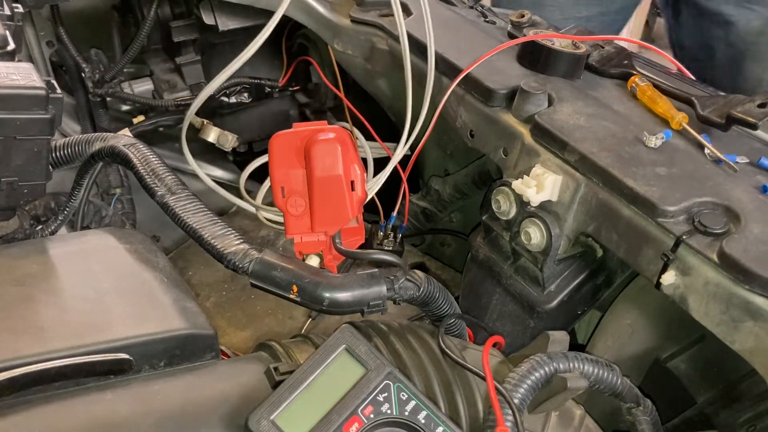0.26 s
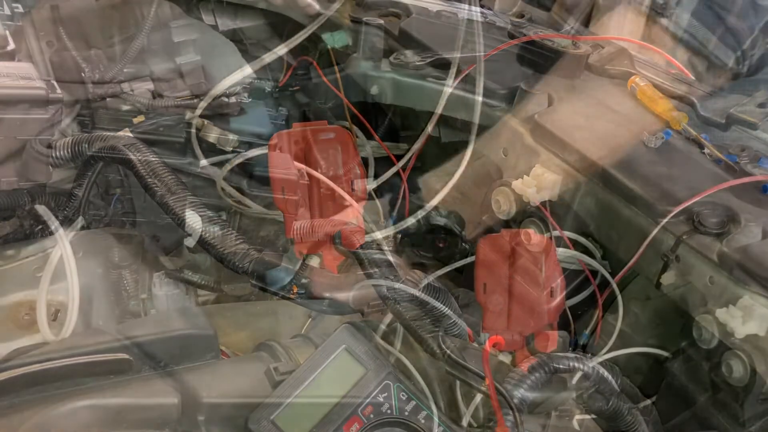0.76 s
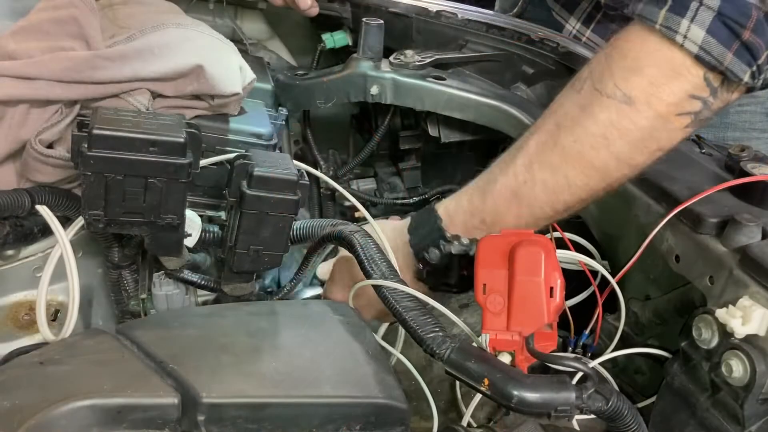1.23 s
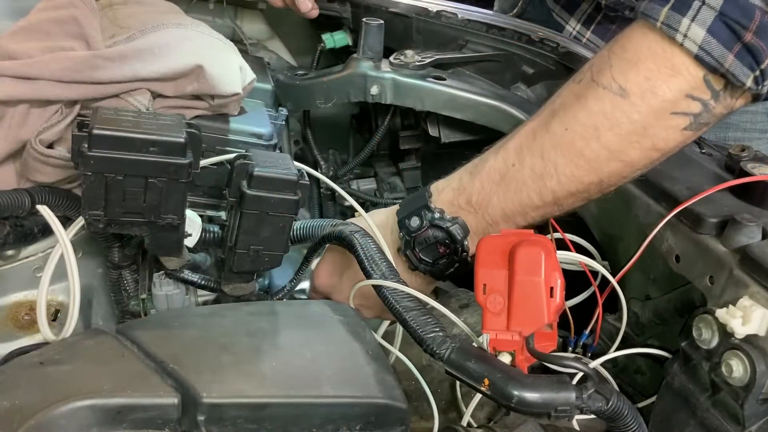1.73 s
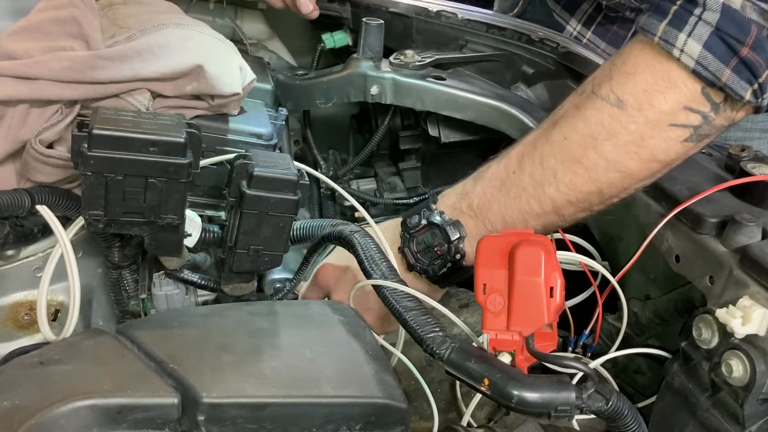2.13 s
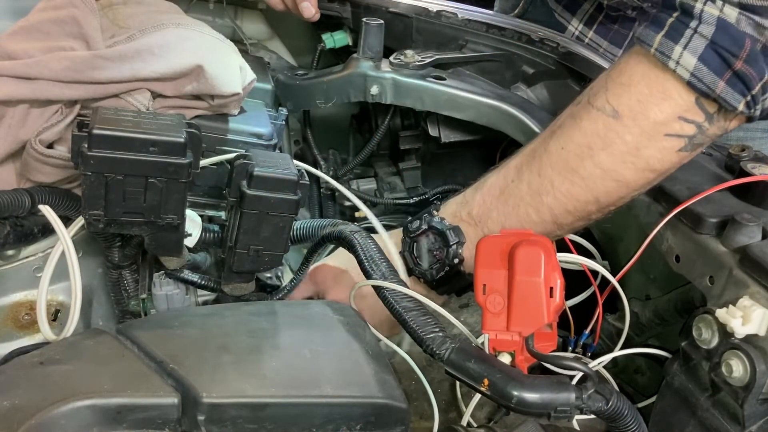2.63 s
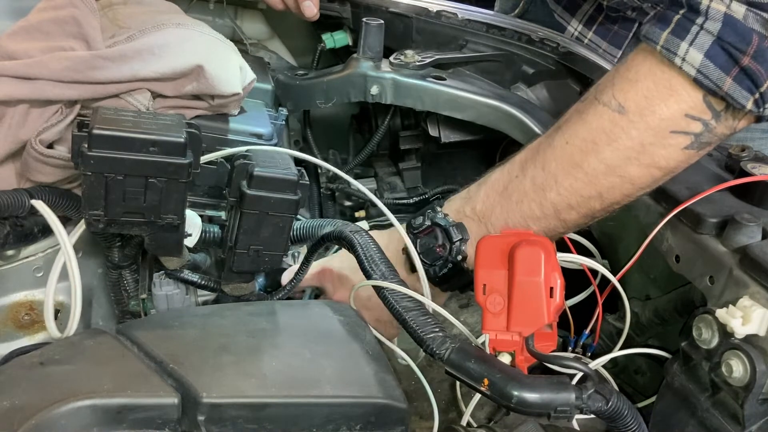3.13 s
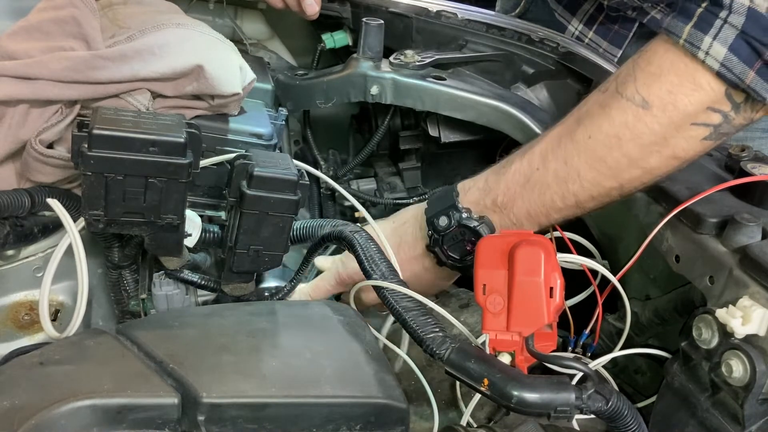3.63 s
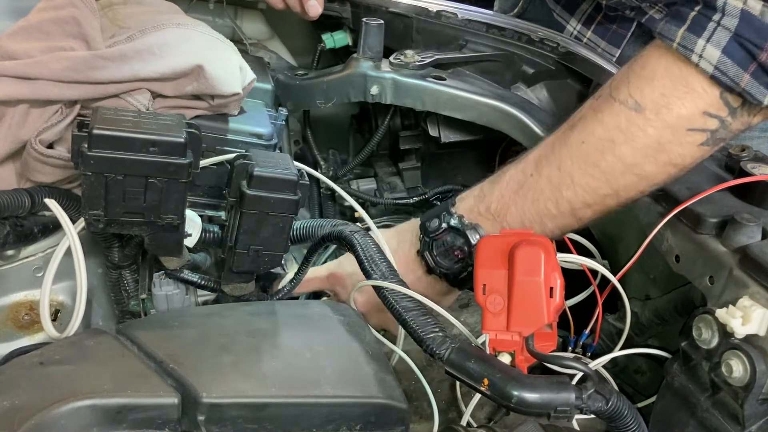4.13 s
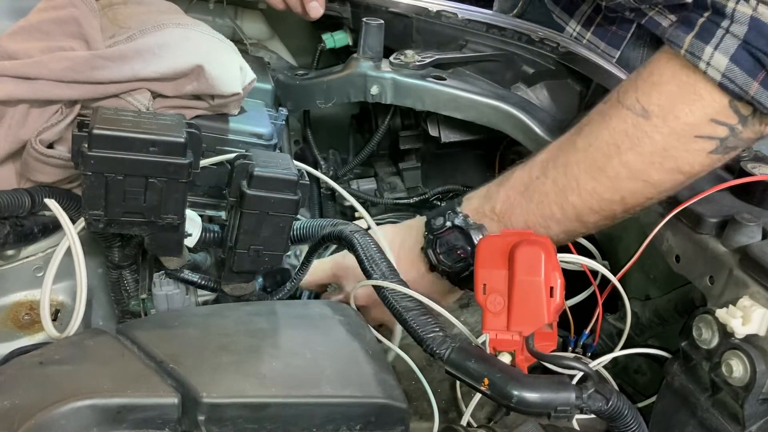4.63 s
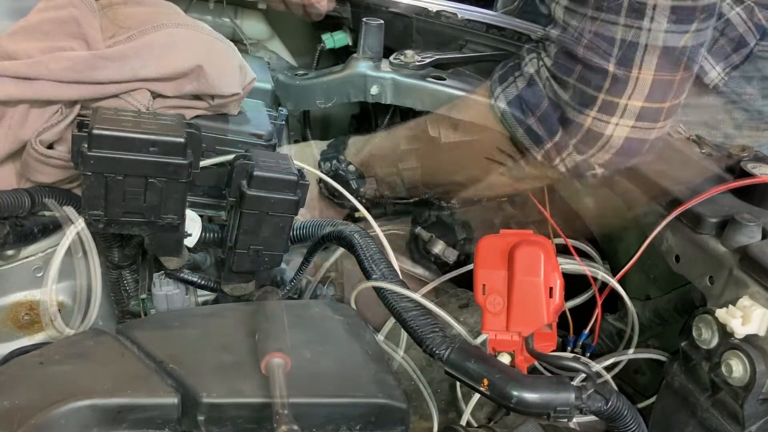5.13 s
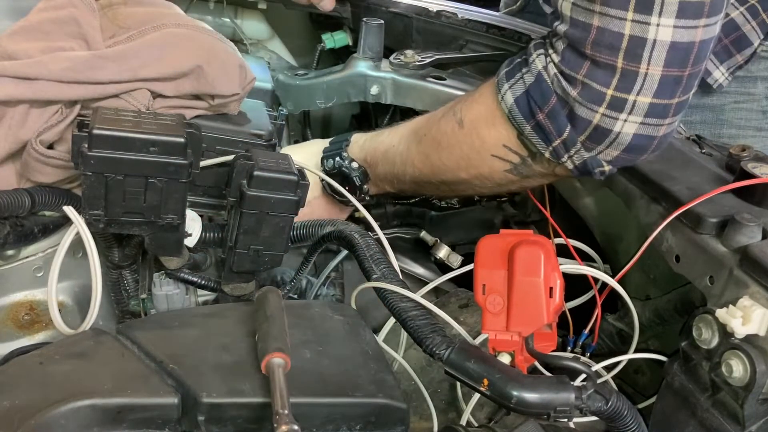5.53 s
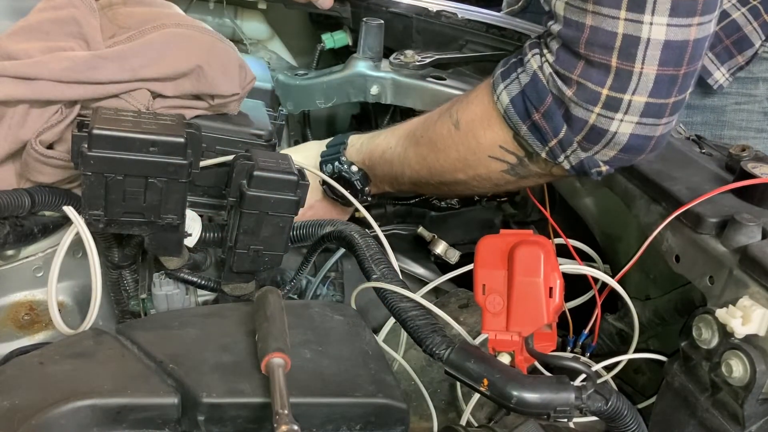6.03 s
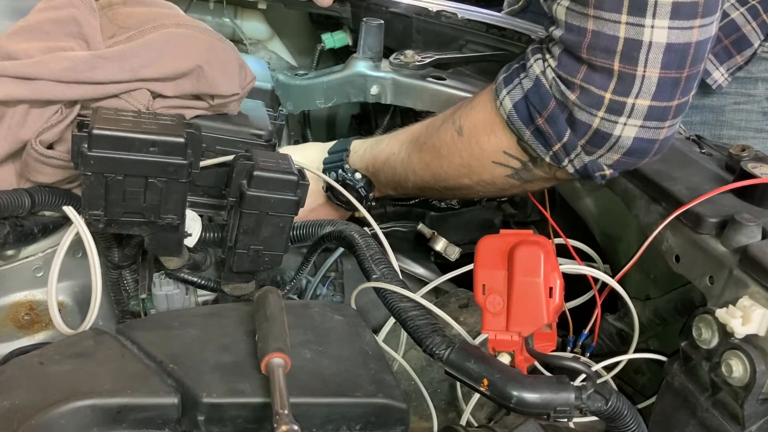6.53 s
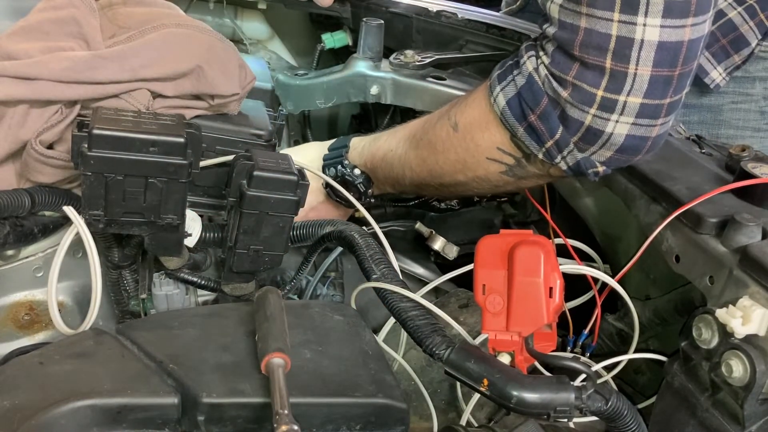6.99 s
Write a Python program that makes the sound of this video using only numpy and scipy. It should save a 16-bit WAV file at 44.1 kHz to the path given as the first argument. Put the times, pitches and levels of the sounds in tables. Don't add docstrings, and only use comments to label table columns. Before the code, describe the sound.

Short zipping ratchet clicks, dull panel thumps and hard clunks in a garage give way to quiet, sparse ticking of plastic connector pieces.

```python
import sys
import numpy as np
from scipy import signal
from scipy.fft import rfft, irfft, next_fast_len
from scipy.io import wavfile
from scipy.ndimage import uniform_filter1d

SR = 44100
rng = np.random.default_rng(int(sys.argv[2]) if len(sys.argv) > 2 else 0)


def file_out(sig):
    cols = np.atleast_2d(sig).T
    lim = np.clip(cols, -1, 1)
    pcm = np.round(lim * 32767).astype(np.int16)
    wavfile.write(sys.argv[1], SR, pcm)


def level_to_linear(level):
    exponent = np.asarray(level, float) / 20
    return 10 ** exponent


N = 320121
HZ = np.fft.rfftfreq(next_fast_len(N + SR), 1 / SR)[1:]
TOOL_DOWN_S = 5.25


def at_hz(points, hz):
    point_hz, value = np.transpose(points)
    return np.interp(np.log(hz), np.log(point_hz), value)


def shaped(x, gain):
    return irfft(rfft(x, 2 * len(HZ)) * np.r_[0, gain])[..., :N]


def coloured(x, spectrum):
    gain = level_to_linear(at_hz(spectrum, HZ))
    return shaped(x, gain / np.sqrt(np.mean(gain ** 2)))


def drift(per_s, count):
    knots = rng.standard_normal((count, 400))
    return [np.interp(np.arange(N) / SR * per_s, np.arange(400), k) for k in knots]


def grains(per_s, spread_db):
    size_db = spread_db * np.minimum(rng.exponential(1, (2, N)), 4)
    size = level_to_linear(size_db) * rng.standard_normal((2, N))
    slips = size * (rng.random((2, N)) < per_s / SR)
    return slips / slips.std()


def rattle(t60, rise_s, length=6000):
    t = np.arange(length) / SR
    return (1 - np.exp(-t / max(rise_s, 1e-5))) * level_to_linear(-60 * t / max(t60, 0.005))


def lay(times_s, gains, shapes):
    power = np.zeros(N + 6000)
    for s, gain, shape in zip(times_s, gains, shapes):
        start = round(s * SR)
        power[start:start + len(shape)] += (gain * shape) ** 2
    return np.sqrt(power[:N])


def ring(drive, hz, t60):
    r, w = level_to_linear(-60 / (t60 * SR)), 2 * np.pi * hz / SR
    gain = np.sin(w) * np.sqrt(2 - 2 * r * r)
    return signal.lfilter([0, gain], [1, -2 * r * np.cos(w), r * r], drive + 1e-18)


def struck(modes, s, level_db, shapes, steady, uneven_db, patchy_db, spot_hz=None, fall_db=0):
    luck = rng.standard_normal((len(s), len(modes)))
    white = rng.standard_normal((3, 2, N))
    wander = drift(14.0, count=len(modes))
    out = 0
    for k, (hz, db, t60) in enumerate(modes):
        octaves_away = 0 if spot_hz is None else np.abs(np.log2(hz / spot_hz))
        blow_db = level_db + uneven_db * luck[:, k] - fall_db * octaves_away
        rub = steady * level_to_linear(patchy_db * wander[k])
        force = np.hypot(lay(s, level_to_linear(blow_db), shapes), rub)
        out = out + level_to_linear(db) * ring(force * white[k % 3], hz, t60)
    return out


def rubbing():
    # middle_s, half_length_s, panel_db, housing_db, rustle_db
    scuffs = [(0.38, 0.75, -59.5, -66.5, -86), (0.683, 0.55, -58.5, -65.5, -74),
              (0.933, 0.11, -62, -59.5, -90), (1.142, 0.5, -38, -42.5, -57.5),
              (1.553, 0.35, -44.5, -47.5, -66), (1.769, 0.31, -56, -45, -48),
              (2.012, 0.065, -34.5, -73, -80), (2.46, 0.19, -65, -52, -48), (2.578, 0.35, -46, -54.5, -61),
              (3.01, .2, -44.5, -50.5, -66), (3.291, 0.11, -53.5, -78.5, -93),
              (3.622, 0.18, -41, -56.5, -62), (3.948, 0.18, -41.5, -60, -88), (4.192, 0.14, -51, -61, -60),
              (4.51, 0.11, -59.5, -51, -64.5), (4.602, 0.068, -57.5, -50.5, -40.5),
              (4.76, 0.27, -40, -59.5, -58), (5.094, 0.73, -60.5, -60, -74),
              (5.622, 0.69, -84.5, -71.5, -77.5), (5.91, 0.19, -61, -83, -91),
              (6.173, 0.31, -64.5, -64.5, -78), (6.503, 0.39, -64.5, -63, -68),
              (7.146, 0.37, -71, -55.5, -70), (6.752, 0.063, -64.5, -67, -74.5)]
    # level_db of panel, housing, rustle
    still_db = [-82, -84, -89]
    fall_db = 36.5
    t = np.arange(0, N + 64, 64) / SR
    power = level_to_linear(np.array(still_db))[:, None] ** 2
    for s, half_s, *peak_db in scuffs:
        below_db = fall_db * np.abs(t - s) / max(half_s, 0.02)
        power = power + level_to_linear(np.array(peak_db)[:, None] - below_db) ** 2
    return [np.interp(np.arange(N) / SR, t, p) for p in np.sqrt(power)]


def knocks():
    # start_s, ring_db, tick_db, decay_ms
    on_housings = [(.136, -38, -63, 73), (.215, -40.5, -83, 74), (.721, -36, -61, 175),
                   (.744, -33, -50, 177), (1.099, -27.5, -47, 77), (1.114, -26, -36.5, 89),
                   (1.467, -27.5, -30.5, 86), (2.011, -27, -53, 50), (2.244, -47, -49, 103),
                   (2.935, -43.5, -47.5, 110), (3.465, -31, -47, 164), (3.605, -24, -37, 60),
                   (3.89, -36, -58.5, 134), (4.397, -50.5, -52.5, 66), (4.685, -25.5, -49, 96),
                   (5.357, -46, -95, 120), (5.84, -35, -48.5, 144), (5.963, -49, -77, 75),
                   (6.911, -35, -50, 135), (7.017, -52, -64, 52), (7.067, -52, -60, 45)]
    # start_s, ring_db, tick_db, decay_ms
    on_panels = [(.292, -41.5, -63, 135), (.332, -54.5, -48.5, 160), (.61, -29.5, -48.5, 95),
                 (.887, -22.5, -41, 67), (1.23, -35.5, -42, 58), (1.253, -27, -44, 80),
                 (1.507, -24, -45.5, 44), (1.554, -22, -44.5, 100), (1.994, -33.5, -63, 120),
                 (2.274, -56, -53, 84), (2.369, -32, -47, 82), (2.403, -34.5, -55, 37),
                 (2.616, -25.5, -49, 90), (2.692, -39.5, -41.5, 35), (2.711, -39, -53, 25),
                 (2.819, -46, -49.5, 100), (3.249, -49.5, -91, 97), (3.483, -23.5, -38.5, 76),
                 (3.567, -30, -40, 47.5), (3.782, -46, -75.5, 135), (3.828, -45, -83.5, 160),
                 (4.176, -30.5, -62, 75), (4.458, -29.5, -38.5, 113), (4.943, -37.5, -66, 36),
                 (5.197, -44.5, -72.5, 126)]
    # start_s, ring_db, thud_db, tick_db,
    # decay_ms
    on_brackets = [(0.346, -57, -67, -47, 94), (.364, -59, -53, -44.5, 61), (0.398, -63, -56, -39, 59),
                   (.462, -51, -68, -41.5, 110), (0.49, -44.5, -74, -40, 60), (0.528, -47, -71, -37.5, 71),
                   (0.559, -47, -51, -33, 64), (0.909, -36.5, -53, -27, 110), (1.039, -22, -35, -42, 47),
                   (1.439, -38, -50, -25.5, 61), (2.565, -40, -58.5, -42, 40),
                   (2.906, -32, -37, -46.5, 187), (3.331, -59, -71, -51.5, 47),
                   (3.927, -35, -51, -53.5, 90), (4.075, -36, -45, -30.5, 62),
                   (4.149, -34.5, -35, -58.5, 100), (4.76, -22.5, -35, -37.5, 140),
                   (4.834, -44, -31, -35, 36), (4.972, -36.5, -44.5, -58.5, 130)]
    # start_s, ring_db, thud_db, decay_ms, spot_hz
    heavy_blows = [
        (1.138, -8.5, -18.5, 83, 1160),
        (1.614, -9, -16.5, 81, 2030),
        (4.79, -10, -16.5, 72, 2250),
    ]
    # start_s, ring_db, tick_db, decay_ms, spot_hz
    on_parts = [(5.307, -49.5, -59, 58, 1700), (5.411, -45.5, -47.5, 95, 1830),
                (5.528, -51.5, -58, 92, 1590), (5.551, -44.5, -51.5, 64, 1820),
                (5.638, -44.5, -38, 80, 1770), (5.779, -46, -59.5, 110, 1750),
                (6.011, -40, -56.5, 200, 2660), (6.076, -45.5, -46, 72, 2850),
                (6.239, -47, -58.5, 105, 1500), (6.365, -44.5, -62, 220, 2400),
                (6.418, -42.5, -45.5, 80, 1720), (6.467, -35.5, -31, 54, 1670), (6.575, -48, -65, 90, 1680),
                (6.635, -50.5, -71, 170, 1700), (6.711, -48.5, -53.5, 92, 1690),
                (6.749, -45, -70, 113, 1436), (6.903, -42, -41, 66, 1470), (6.955, -38.5, -55.5, 87, 1620),
                (7.105, -30.5, -30, 86, 1590), (7.193, -44, -47.5, 104, 1680)]
    rows = [(s, r, thud, r - 12.5, ms, hz) for s, r, thud, ms, hz in heavy_blows]
    rows += [(*row, 2200) for row in on_brackets]
    rows += [(s, r, r - 26, tick, ms, hz) for s, r, tick, ms, hz in on_parts]
    rows += [(s, r, r - 4.5, tick, ms, 800) for s, r, tick, ms in on_panels]
    rows += [(s, r, r - 21, tick, ms, 750) for s, r, tick, ms in on_housings]
    return np.transpose(rows)


def panel_thuds(s, thud_db, t60, rub, pawl):
    # pitch_hz, level_db, t60_s
    panel_modes = [(120, -14, 0.09), (198, -11, 0.036), (246, -3, .07), (304.7, -1.5, .06),
                   (345.3, -4, .06), (406.8, -3.5, 0.064), (505, -5, 0.029)]
    slow = [rattle(1.1 * t, rise_s=0.014) for t in t60]
    steady = np.hypot(level_to_linear(-5.5) * rub, level_to_linear(-23.5) * pawl)
    thud = struck(panel_modes, s, thud_db + 3.0, slow, steady, uneven_db=3.5, patchy_db=1.0)
    return signal.sosfilt(signal.butter(3, [110.0, 1500.0], "band", fs=SR, output="sos"), thud)


def housing_rings(s, ring_db, sharp, spot_hz, rub, pawl):
    # pitch_hz, level_db, t60_s
    housing_modes = [(633.5, -7, 0.021), (832.3, -6.5, 0.088), (1012, -5, 0.018), (1283, -6, 0.016),
                     (1461, -7.5, 0.036), (1528, -13.5, 0.035), (1680, -6, 0.025), (1770, -2.5, 0.0083),
                     (2156, -3, 0.022), (2360, -8, 0.03), (2674, -3.5, 0.013), (3048, -9, 0.027)]
    ring_db = ring_db - 6.0 + 1.33 * (s > TOOL_DOWN_S)
    steady = np.hypot(level_to_linear(-3) * rub, level_to_linear(-19) * pawl)
    return struck(housing_modes, s, ring_db, sharp, steady, uneven_db=2.5, patchy_db=3.0,
                  spot_hz=spot_hz, fall_db=8.0)


def body_noise(s, ring_db, sharp, spot_hz, rub, pawl):
    # pitch_hz, level_db (per Hz)
    body_colour = [(250, -12), (600, 5.5), (1100, -6), (2200, 8.5), (3200, 11), (4500, 9), (7000, 0),
                   (14000, -24)]
    soft = spot_hz < 1150
    slips = grains(per_s=12000, spread_db=2.5)
    clumps = level_to_linear(5.3 * drift(25.0, count=1)[0])
    steady = np.hypot(level_to_linear(-4.0) * rub * clumps, level_to_linear(-15.0) * pawl)
    hit_db = ring_db - 8.0 - 4.4 * soft - 2.5 * (s > TOOL_DOWN_S)
    force = np.hypot(lay(s, level_to_linear(hit_db), sharp), steady)
    dull = lay(s, level_to_linear(ring_db - 3.0) * soft, sharp) * slips
    dull = signal.sosfilt(signal.butter(2, 1700.0, fs=SR, output="sos"), dull)
    return coloured(force * slips + dull, body_colour)


def small_part_ticks(s, tick_db, t60, rustle, pawl):
    # pitch_hz, level_db (per Hz)
    steel = [(300, -36), (1500, -19.5), (4200, -6.5), (5800, -12), (7000, -4.5), (8200, -4.5), (10000, -2),
             (11300, -5.5), (12600, -4.5), (13800, -13.5), (15500, -10)]
    # pitch_hz, level_db (per Hz)
    plastic = [(500, -92), (1600, -0.5), (3000, -5.5), (6000, 0), (9000, -2.5), (12500, -3.5),
               (15500, -15.5)]
    short = []
    for t in t60:
        strike = rattle(0.5 * t, rise_s=0.0012 + 0.12 * t * t)
        short.append(strike + level_to_linear(-11) * rattle(1.5 * t, rise_s=0.003))
    clumps = level_to_linear(5.3 * drift(25.0, count=1)[0])
    force = np.hypot(lay(s, level_to_linear(tick_db + 2.5), short), level_to_linear(2.5) * rustle * clumps)
    ticks = np.hypot(force, pawl) * grains(per_s=25000, spread_db=1.5)
    early = np.arange(N) < TOOL_DOWN_S * SR
    return coloured(ticks * early, steel) + level_to_linear(3.5) * coloured(ticks * ~early, plastic)


def tooth_drops():
    # first_tooth_s, length_s, teeth, level_db, stall_share (of length)
    strokes = [
        (0.915, 0.08, 10, -25.5, 0.074),
        (1.2897, 0.087, 11, -23.5, .02),
        (1.7252, 0.14, 15, -24.5, 0.042),
        (2.4227, 0.071, 10, -24, 0.061),
        (2.947, 0.095, 11, -23, 0.17),
        (3.9541, .1137, 7, -23, .2),
        (4.5143, 0.12, 12, -24, 0.22),
        (4.9894, 0.12, 11, -29, 0.089),
    ]
    slowing, stall_power, jitter_teeth, uneven_db = 0.092, 9, 0.033, 2
    rows = []
    for s, length_s, count, db, stall in strokes:
        early_late, loudness = rng.standard_normal((2, round(count)))
        last = round(count) - 1
        k = np.arange(last + 1)
        inner = k % last > 0
        u = (k + jitter_teeth * early_late * inner) / last
        progress = (1 - slowing - stall) * u + slowing * u * u + stall * u ** stall_power
        rows += zip(s + length_s * progress, db + uneven_db * loudness)
    return np.transpose(rows)


def ratchet_teeth():
    # pitch_hz, level_db, t60_s
    pawl_modes = [(4870, -13.5, 0.0047), (7040, -4.5, 0.0042), (8040, -9.5, 0.013), (9400, -11.5, 0.0034),
                  (11470, -3, 0.011), (12880, 4, 0.0059)]
    s, db = tooth_drops()
    click = rattle(t60=0.026, rise_s=0.0008) + level_to_linear(-12) * rattle(t60=0.08, rise_s=0.003)
    clicks = [click] * len(s)
    pawl_ring = struck(pawl_modes, s, db - 8.0, clicks, 0, uneven_db=4.0, patchy_db=0)
    return lay(s, level_to_linear(db - 0.5), clicks), pawl_ring


def ratchet_work():
    panel_rub, housing_rub, rustle = rubbing()
    s, ring_db, thud_db, tick_db, decay_ms, spot_hz = knocks()
    pawl, pawl_ring = ratchet_teeth()
    t60 = decay_ms / 1000
    sharp = [rattle(t, rise_s=0.27 * t * t) for t in t60]
    thuds = panel_thuds(s, thud_db, t60, panel_rub, pawl)
    rings = housing_rings(s, ring_db, sharp, spot_hz, housing_rub, pawl)
    body = body_noise(s, ring_db, sharp, spot_hz, housing_rub, pawl)
    ticks = small_part_ticks(s, tick_db, t60, rustle, pawl)
    return thuds + rings + body + pawl_ring + ticks


def building_rumble():
    # pitch_hz, level_db (per Hz)
    rumble_colour = [(25, -2), (55, 0), (120, -1.5), (300, -14.5), (1000, -25.5), (4000, -56)]
    return level_to_linear(-72.5) * coloured(rng.standard_normal((2, N)), rumble_colour)


def garage(wet_db):
    # pitch_hz, t60_s
    garage_t60 = [(100, 0.6), (1000, 0.28), (5000, 0.32), (14000, 0.039)]
    response = 0
    for k, lag_s in enumerate(rng.uniform(0.011, 0.045, 10)):
        echo = level_to_linear(-60 * lag_s / at_hz(garage_t60, HZ)) * np.exp(-2j * np.pi * HZ * lag_s)
        response = response + (-1) ** k * echo / (1 - echo)
    return 1 + level_to_linear(wet_db) * response


def two_ports(near, other):
    # pitch_hz, likeness (0-1)
    likeness = [(100, 0.93), (300, 0.77), (700, 0.3), (1800, 0.5), (4300, 0.1), (5500, 0.47), (7000, 0.64),
                (12000, 0.93), (16000, 0.8)]
    # pitch_hz, level_db
    left_over_right = [(60, -0.5), (180, -0.5), (550, 1.5), (1650, 1.5), (4970, 0.5), (15000, 0.0)]
    lag_s, lead_s, turn_rad = 91e-6, 224e-6, 9.73
    lag_phase = -2 * np.pi * HZ * lag_s
    lead_phase = 2 * np.pi * HZ * lead_s - turn_rad
    phase = np.where(HZ > 5900, lead_phase, lag_phase)
    alike = np.clip(at_hz(likeness, HZ), 0, 1)
    room = garage(wet_db=-18.0)
    tilt = level_to_linear(at_hz(left_over_right, HZ) / 2)
    left = shaped(near, room * tilt)
    right = shaped(near, room / tilt * alike * np.exp(1j * phase))
    right = right + shaped(other, room / tilt * np.sqrt(1 - alike ** 2))
    return np.array([left, right])


def scene():
    near, other = ratchet_work() + building_rumble()
    return two_ports(near, other) + level_to_linear(-91.0) * rng.standard_normal((2, N))


def joint_stereo(x, margin_db):
    hz, _, z = signal.stft([x[0] + x[1], x[0] - x[1]], SR, nperseg=1024)
    for low_hz in np.arange(2600, 16600, 520):
        band = (hz >= low_hz) & (hz < low_hz + 520)
        power = uniform_filter1d(np.sum(np.abs(z[:, band]) ** 2, axis=1), size=3)
        z[:, band] *= (power > power[::-1] * level_to_linear(-2 * margin_db))[:, None]
    mid, side = signal.istft(z, SR, nperseg=1024)[1][:, :N] / 2
    return np.array([mid + side, mid - side])


def low_pass(x):
    return signal.sosfilt(signal.butter(12, 16810, fs=SR, output="sos"), x)


def record(dry):
    x = signal.sosfilt(signal.butter(2, 45.0, "high", fs=SR, output="sos"), dry)
    x = signal.sosfilt(signal.cheby2(14, 60, 16350, fs=SR, output="sos"), x)
    x = joint_stereo(x, margin_db=5.5)
    return low_pass(x)


dry = scene()
out = record(dry)
file_out(out)
```